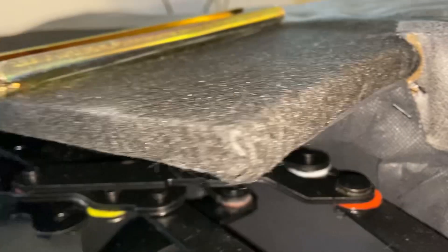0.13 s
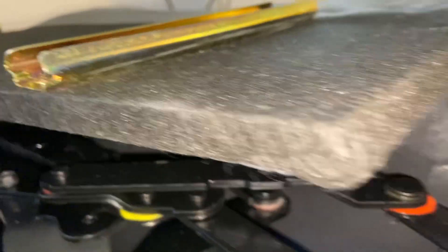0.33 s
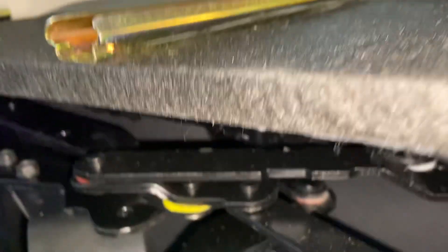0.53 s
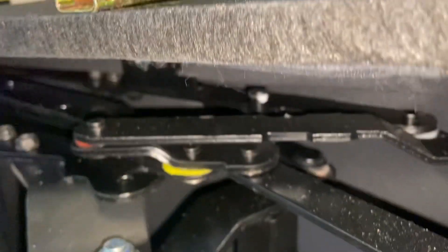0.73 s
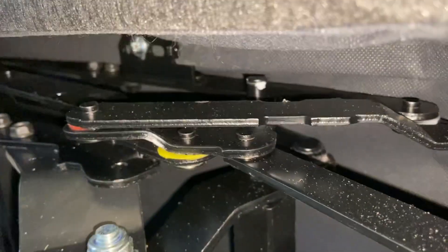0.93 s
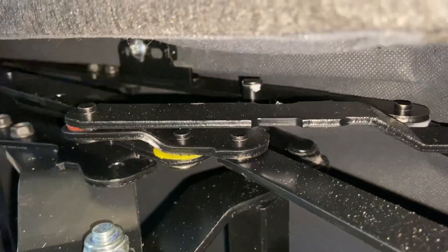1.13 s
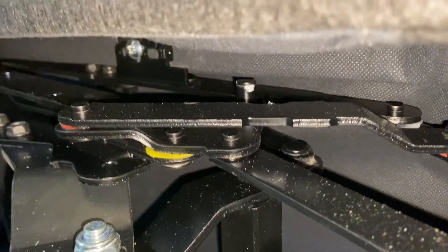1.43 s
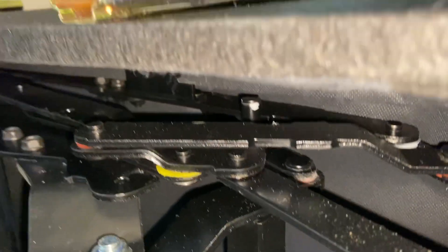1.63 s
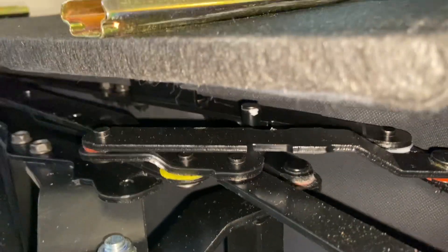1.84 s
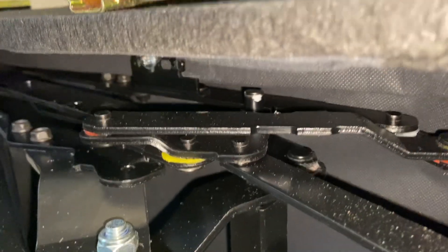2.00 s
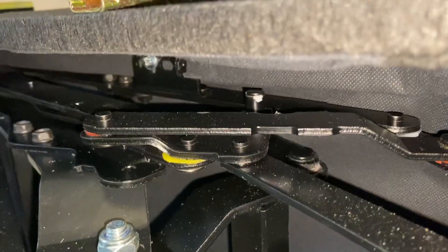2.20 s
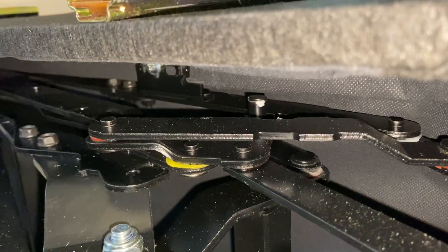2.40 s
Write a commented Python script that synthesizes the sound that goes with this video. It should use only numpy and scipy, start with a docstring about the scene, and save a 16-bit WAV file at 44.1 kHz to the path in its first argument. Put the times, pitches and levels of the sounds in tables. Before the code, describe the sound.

A deep, steady motor hum with soft rushing air fills a room; midway a brief ringing metal scrape sounds close to the microphone, followed by a soft double knock and a few light metallic clicks.

```python
"""A motor hums steadily in a room: a deep note and its overtones, as wavering sines, with mains and appliance tones.
Halfway through, the motor runs a touch faster and its overtones shift. A rush of air, shaped noise, lies around it.
Close to the microphones, the steel linkage of a reclining chair is handled: a short ringing scrape of metal,
grainy noise driving resonances; a soft double knock on the padded frame; then a few light clicks, brief bursts
of noise that set the links ringing and die away in the room."""
import sys
import numpy as np
from scipy import signal
from scipy.fft import rfft, irfft
from scipy.io import wavfile

SR = 44100
rng = np.random.default_rng(int(sys.argv[2]) if len(sys.argv) > 2 else 0)


def pcm_store(signal):
    """Save signal as 16-bit PCM."""
    levels = np.round(np.clip(np.atleast_2d(signal), -1, 1) * 32767)
    wavfile.write(sys.argv[1], SR, levels.astype(np.int16).T)


N = 112896
T = np.arange(N) / SR  # s
LINKAGE_LIKENESS = .15  # left-right correlation of the scrape and of the room's answer to the clicks
OVERTONE_WAVER = .11  # relative spread, for overtones and steady tones


def from_db(db):
    """Decibels to gain."""
    return 10 ** (np.asarray(db) / 20)


def rms_one(x):
    """Scale to unit power."""
    return x / np.sqrt(np.mean(x ** 2) + 1e-20)


def in_time(rows):
    """A curve of (t/s, value) read at every sample."""
    return np.interp(T, *np.transpose(rows))


def within(rows):
    """True between the first and last times of a curve."""
    return (T > rows[0][0]) * (T < rows[-1][0])


def at_hz(points, hz):
    """A curve of (f/Hz, value) read on a log-frequency axis."""
    f, value = np.transpose(points)
    return np.interp(np.log(hz + 1e-9), np.log(f), value)


def drift(hz):
    """Slow chance with spread 1: noise through a two-pole lowpass, made at a 40th of the sample rate."""
    step = 40
    pole = np.exp(-2 * np.pi * hz * step / SR)
    grains = rng.standard_normal(N // step + 2002)
    slow = signal.lfilter([1], [1, -2 * pole, pole * pole], grains)[2000:]  # drop the filter's settling
    return np.interp(np.arange(N) / step, np.arange(len(slow)), rms_one(slow))


def noise(spectrum, likeness):
    """Stereo noise with a given density (dB per Hz) and left-right likeness (correlation) over frequency."""
    hz = np.arange(N // 2 + 1) * SR / N
    alike = np.clip(at_hz(likeness, hz), -1, 1)
    density = from_db(at_hz(spectrum, hz)) * np.sqrt(SR) / 2
    mid, side = rfft(rng.standard_normal((2, N))) * density
    return irfft(np.sqrt(1 + alike) * mid + np.sqrt(1 - alike) * side * [[1], [-1]], N)


def ring(force, hz, t60):
    """A damped resonance: a unit click sets a sine of height 1 ringing, 60 dB down after t60 seconds."""
    r = from_db(-60 / (t60 * SR))
    w = 2 * np.pi * hz / SR
    return signal.lfilter([0, np.sin(w)], [1, -2 * r * np.cos(w), r * r], force + 1e-18)


def hum_line(turns, hz, db, waver):
    """One tone, wavering in height and phase, whose wave leads in the left channel."""
    # width of the hum: f/Hz, side minus mid level/dB
    hum_side = [(58, -29), (115, -11.5), (200, -12.5), (290, -7), (370, -4), (440, -3), (900, 6.5)]
    waver_hz, pan_db = 4, -.5  # pan: left minus right
    wander = 1 + waver * (drift(waver_hz) + 1j * drift(waver_hz))
    tone = np.exp(2j * np.pi * (turns + rng.random())) * wander
    side = 1j * from_db(at_hz(hum_side, hz))  # a quarter turn from the mid, so it shifts the phase
    stereo = np.real(tone * np.array([[1 + side], [1 - side]]))
    return np.sqrt(2) * from_db(db) * stereo * from_db([[pan_db / 2], [-pan_db / 2]])


def motor_hum():
    """The motor's deep note at twice its turning speed, the octave above, and overtones that follow the speed."""
    # the motor's turning speed: t/s, turns per second
    motor_speed = [(0, 28.8), (1.42, 28.76), (1.6, 29.02), (2.56, 29.0)]
    # deep note: t/s, level/dB
    bass_level = [(0, -36.5), (.48, -32.5), (.6, -35.5), (.7, -32.5), (1.05, -34.5), (1.3, -34.5),
                  (1.5, -37.5), (1.6, -33.5), (1.77, -33.5), (2.03, -37), (2.14, -33.5), (2.29, -34.5),
                  (2.5, -36)]
    # the octave above, which swells and sinks: t/s, level/dB
    octave_level = [(0, -41.5), (.45, -43), (.7, -44), (.95, -44.5), (1.1, -39), (1.22, -40.5), (1.3, -44),
                    (1.45, -41.5), (1.6, -49.5), (1.95, -45), (2.25, -54.5), (2.56, -45.5)]
    # overtones: multiple of the speed (rounded for the pitch), level before the change/dB, level after/dB
    orders = [(3, -47.5, -60.5), (5, -46, -56.5), (6, -60.5, -62), (7, -52, -63), (7.96, -52.5, -63),
              (9, -59.5, -51.5), (10, -51.5, -56), (13.1, -58.5, -68), (14, -60.5, -58.5), (16, -58.5, -80),
              (18, -61.5, -71), (27, -63.5, -81)]
    change_s, change_takes_s = 1.52, .25
    bass_waver, octave_waver = .069, .066

    speed = in_time(motor_speed)
    mean_speed = speed.mean()
    turns = np.cumsum(speed) / SR
    changed = np.clip((T - change_s) / change_takes_s + .5, 0, 1)
    bass = hum_line(2 * turns, 2 * mean_speed, in_time(bass_level), bass_waver)
    octave = hum_line(4 * turns, 4 * mean_speed, in_time(octave_level), octave_waver)
    overtones = 0
    for order, before, after in orders:
        level_db = before + (after - before) * changed
        overtones = overtones + hum_line(round(order) * turns, order * mean_speed, level_db, OVERTONE_WAVER)
    return bass + octave + overtones


def steady_tones():
    """Mains hum and other appliances: tones that hold their pitch and waver a little."""
    # f/Hz, level/dB
    tones = [(77.5, -61), (119.9, -58), (148.3, -58), (155, -55), (177.6, -51), (235, -61), (239.8, -51.5),
             (359.8, -60), (437, -63.5), (655, -64.5), (873, -65.5)]
    return sum(hum_line(hz * T, hz, db, OVERTONE_WAVER) for hz, db in tones)


def air():
    """A smooth, dull rush that fills the room, with faint resonances, leaning a little to either side by pitch."""
    # the rush without its resonances: f/Hz, level/dB per Hz
    air_colour = [(25, -110), (38, -80), (56, -58.5), (80, -71.5), (110, -67), (190, -70), (260, -69),
                  (330, -72), (440, -72), (620, -75.5), (850, -78), (1150, -81.5), (2000, -86),
                  (3200, -93.5), (4600, -95.5), (6000, -102.5), (7600, -105), (9000, -105.5),
                  (15000, -106.5)]
    # f/Hz, left-right likeness (correlation)
    air_likeness = [(60, .98), (120, .9), (220, .66), (400, .4), (700, -.1), (1290, -.36), (2200, .28),
                    (4400, .2), (15000, 0)]
    # faint peaks and one or two dips: f/Hz, width/Hz, level/dB
    air_peaks = [(449, 26, 2), (847, 16, -4.5), (956, 8.3, 3), (1218, 48, 4.5), (1970, 16, 6),
                 (2184, 27, 4.5), (3400, 34, 2.5), (4860, 240, -0.5), (6790, 520, 7)]
    # where the air sits: f/Hz, left minus right level/dB
    air_pan = [(250, 1.5), (400, 0.5), (650, 3.5), (1300, -2.1), (2400, 0.8), (5000, 0.5), (9000, -0.5)]
    # t/s, level/dB
    air_swell = [(0, 0.5), (.8, 0), (1.5, 0.73), (2.0, 0.5), (2.56, 1.1)]

    hz = np.arange(N // 2 + 1) * SR / N
    peaks_db = sum(db / (1 + (2 * (hz - centre) / width) ** 2) for centre, width, db in air_peaks)
    pan_db = at_hz(air_pan, hz)
    gains = from_db([peaks_db + pan_db / 2, peaks_db - pan_db / 2])
    rush = irfft(rfft(noise(air_colour, air_likeness)) * gains, N)
    return rush * from_db(in_time(air_swell))


def scrape():
    """Grainy friction hisses and rings the rail, over a lower rasp; as the slide slows the ring fades faster."""
    # metal sliding on metal, before the hiss and ring gains: t/s, level/dB
    slide_level = [(1.335, -80), (1.358, -64), (1.378, -56.5), (1.4, -52.5), (1.415, -55), (1.44, -55),
                   (1.47, -60.5), (1.5, -59), (1.58, -63.5), (1.68, -73)]
    # colour of the friction: f/Hz, relative level/dB per Hz
    hiss_colour = [(1500, -28), (2600, -4), (3400, 1), (4300, 2), (4700, 3), (5300, 15), (5750, 6),
                   (6100, 10), (8200, -12), (11000, -0.5), (15000, -26)]
    # what it sets ringing: f/Hz, relative level/dB, t60/s
    rail_modes = [(3951, -13, .11), (4580, -15, .06), (4810, -11, .04), (4970, -8, .025), (5120, -13, .02),
                  (5308, -6, .05), (5450, -11, .02), (5720, -13.5, .04), (8140, -22, .02)]
    # lower rasp: t/s, level/dB
    rasp_curve = [(1.35, -71), (1.39, -58), (1.45, -57.5), (1.51, -61.5), (1.6, -70)]
    # its resonances: f/Hz, relative level/dB, t60/s
    rasp_modes = [(2495, 0, .03), (2650, -7, .012), (2830, -2, .03)]
    hiss_db, ring_start_db, grain_db = 3.5, 7.5, 1.5
    slows_s, ring_fade_db_per_s = 1.45, 30

    grain = from_db(grain_db * drift(hz=150))
    friction = rms_one(noise(hiss_colour, [(1, LINKAGE_LIKENESS)]) * grain)
    rings = sum(from_db(db) * rms_one(ring(friction, hz, t60)) for hz, db, t60 in rail_modes)
    ring_db = ring_start_db - ring_fade_db_per_s * np.maximum(T - slows_s, 0)
    level = from_db(in_time(slide_level)) * within(slide_level)
    rasp = sum(from_db(db) * rms_one(ring(friction, hz, t60)) for hz, db, t60 in rasp_modes)
    rasp_level = from_db(in_time(rasp_curve)) * within(rasp_curve)
    return level * (from_db(hiss_db) * friction + from_db(ring_db) * rings) + rasp_level * rasp


def knocks():
    """Soft, dull bumps on the padded frame: impulses into its low modes, alike in both channels."""
    # t/s, level/dB
    bumps = [(1.812, -34), (1.862, -38.5)]
    # the frame: f/Hz, relative level/dB, t60/s
    frame_modes = [(205, -17, 0.024), (263, 5.5, 0.072)]
    force = np.zeros(N)
    for s, db in bumps:
        force[int(s * SR)] += from_db(db)
    return sum(from_db(db) * ring(force, hz, t60) for hz, db, t60 in frame_modes)


def clicks():
    """Brief crunches, each with a pitch of its own, ring the steel links and die away in the room."""
    # crunches: t/s, level/dB, rise/s, decay/s, resonance f/Hz, its level/dB,
    # relative strike on the links level/dB, left minus right level/dB, dull above f/Hz
    crunch_rows = [(2.0725, -38.5, .0002, .0036, 5950, 7, -10, -1.4, 12000),
                   (2.0885, -44, .0015, .003, 5600, 2, -6, 3, 14000),
                   (2.093, -39.7, .0015, .0052, 3100, 4, -3, 3.6, 10000),
                   (2.1645, -47.5, .011, .01, 3400, 1.5, -4, .8, 6200)]
    # shared colour: f/Hz, relative level/dB per Hz
    click_colour = [(1000, -16), (1500, -10), (2200, -2.5), (3200, -1), (4000, -2.5), (5400, -1), (6200, 1),
                    (7000, 0), (8500, -7), (11000, -5.5), (15000, -11.5)]
    # what they set ringing: f/Hz, relative level/dB, t60/s
    link_modes = [(2250, -12, .04), (3110, -6, .06), (3313, -16, .08), (3575, -13, .12), (4110, -18, .2),
                  (4195, -14, .14), (4720, -14, .08), (5040, -17, .3), (5190, -14, .3), (5950, -8, .04),
                  (7050, -13, .07)]
    # colour of the room's answer: f/Hz, relative level/dB per Hz
    tail_colour = [(1400, -15), (2600, -10), (3500, 6), (5200, 6), (6200, -3), (7000, 2), (8500, -15),
                   (11000, -8), (15000, -17)]
    peak_width_hz, click_likeness = 1200, .55
    link_ring_db, strike_spread_s = 1.5, .002
    tail_db, tail_rise_s, tail_t60_s, tail_grain_db = -15, .0052, .75, 2

    crunches, tail_power, strikes = 0, 0, np.zeros((2, N))
    grid = np.geomspace(1000, 16000, 80)  # Hz
    for s, db, rise, decay, peak_hz, peak_db, strike_db, pan_db, dull_hz in crunch_rows:
        after = np.maximum(T - s, 0)
        before = np.maximum(s - T, 0)
        peak = peak_db / (1 + (2 * (grid - peak_hz) / peak_width_hz) ** 2)
        dulling = 10 * np.log10(1 + (grid / dull_hz) ** 4)
        colour = np.transpose([grid, at_hz(click_colour, grid) + peak - dulling])
        gains = from_db([db + pan_db / 2, db - pan_db / 2])
        crunch = gains[:, None] * rms_one(noise(colour, [(1, click_likeness)]))
        crunches = crunches + crunch * np.exp(-before / rise - after / decay)
        tail = (1 - np.exp(-after / tail_rise_s)) * np.exp(-np.log(1000) * after / tail_t60_s)
        tail_power = tail_power + (from_db(db + tail_db) * tail) ** 2
        strikes[:, int(s * SR)] += gains * from_db(strike_db)

    rings = 0
    for hz, db, t60 in link_modes:
        delay = int(strike_spread_s * rng.random() * SR)  # each mode starts a little late, by chance
        rings = rings + from_db(db + link_ring_db) * ring(np.roll(strikes, delay), hz, t60)
    grain = from_db(tail_grain_db * drift(hz=120))
    room = rms_one(noise(tail_colour, [(1, LINKAGE_LIKENESS)]) * grain)
    return crunches + rings + np.sqrt(tail_power) * room


def scene():
    """The room's hum and air, with the chair's small noises close by."""
    return motor_hum() + steady_tones() + air() + scrape() + knocks() + clicks()


def record(dry):
    """The sound starts after a moment of silence; a steep lowpass cuts the top."""
    start_s, fade_in_s, cutoff_hz = .033, .002, 15800
    started = np.clip((T - start_s) / fade_in_s, 0, 1)
    lowpass = signal.ellip(10, .1, 80, cutoff_hz, fs=SR, output="sos")  # ripple and stopband in dB
    return signal.sosfilt(lowpass, dry * started)


dry = scene()
out = record(dry)
pcm_store(out)
```